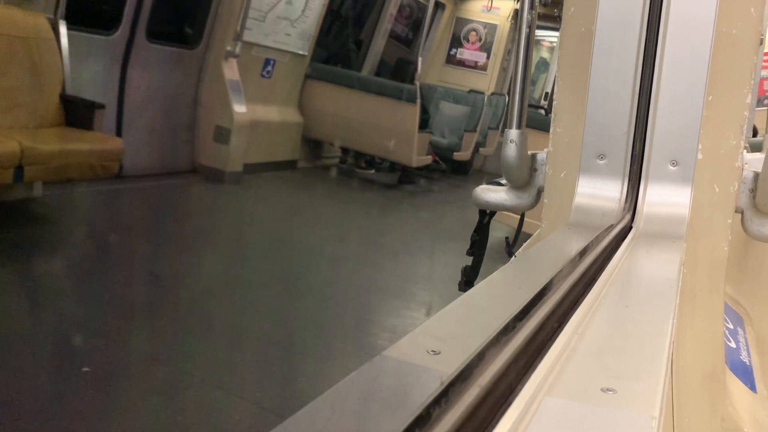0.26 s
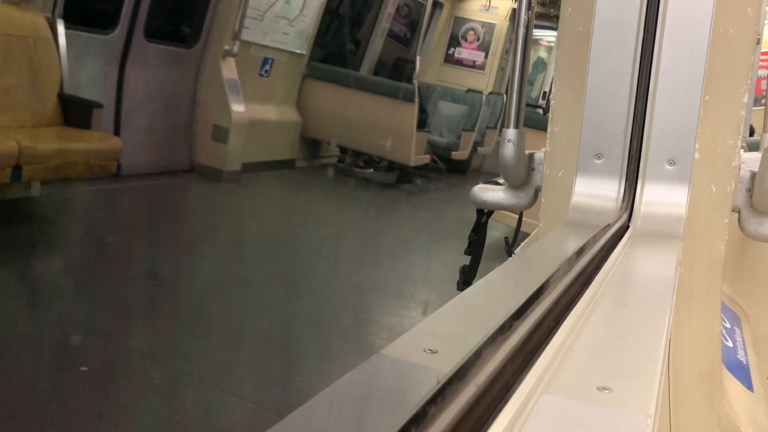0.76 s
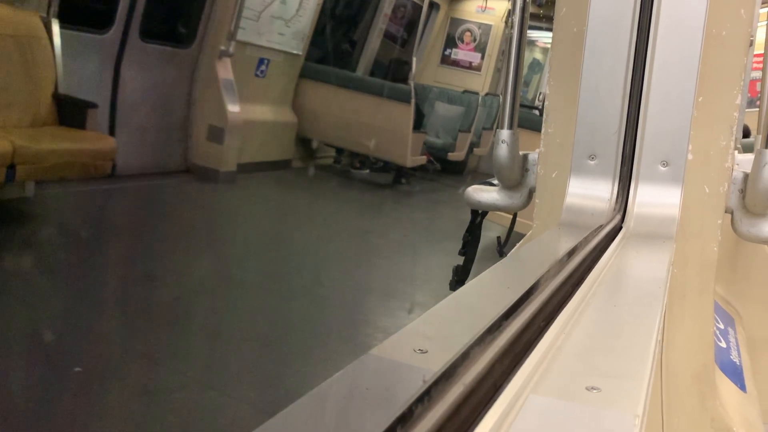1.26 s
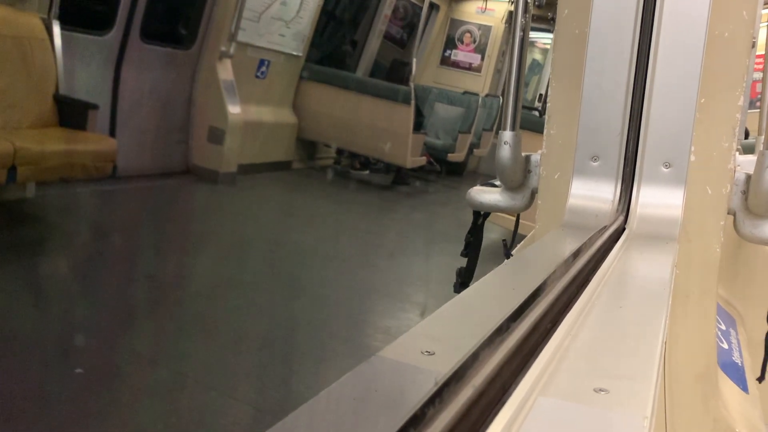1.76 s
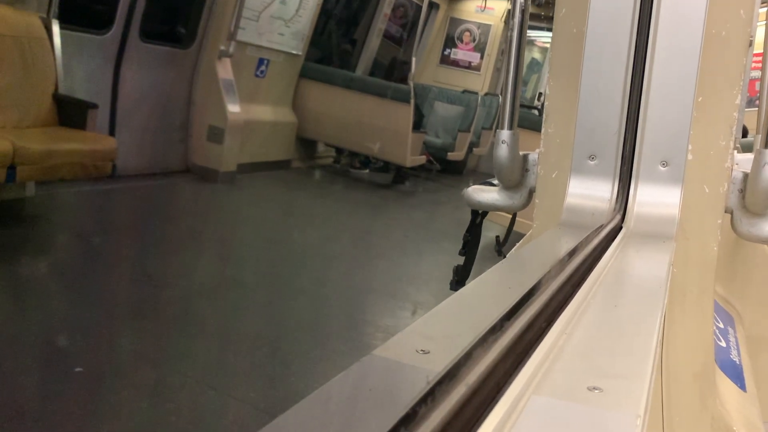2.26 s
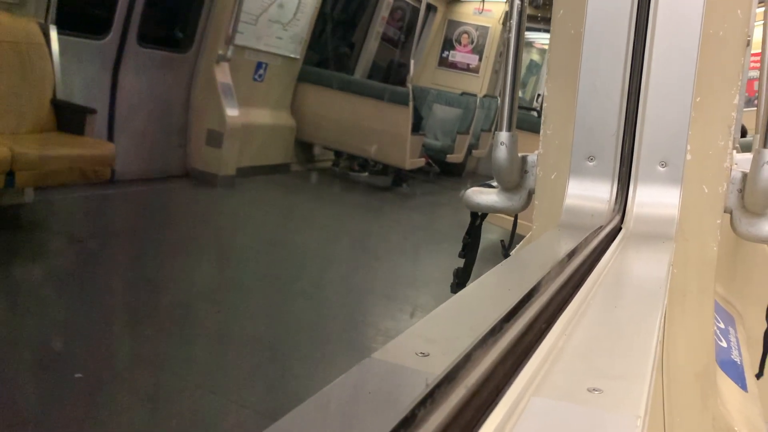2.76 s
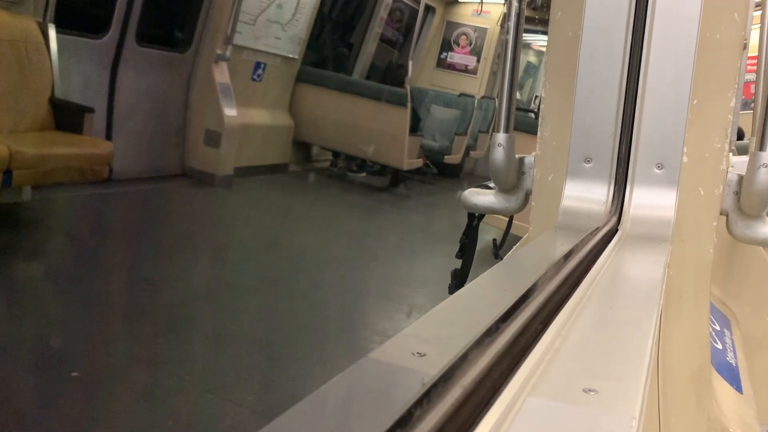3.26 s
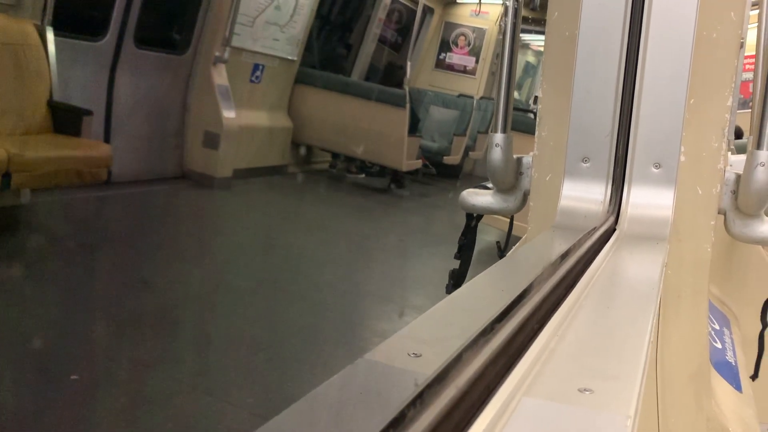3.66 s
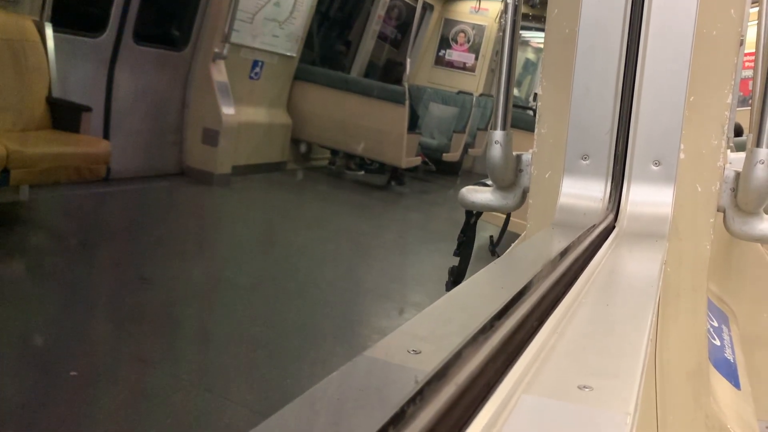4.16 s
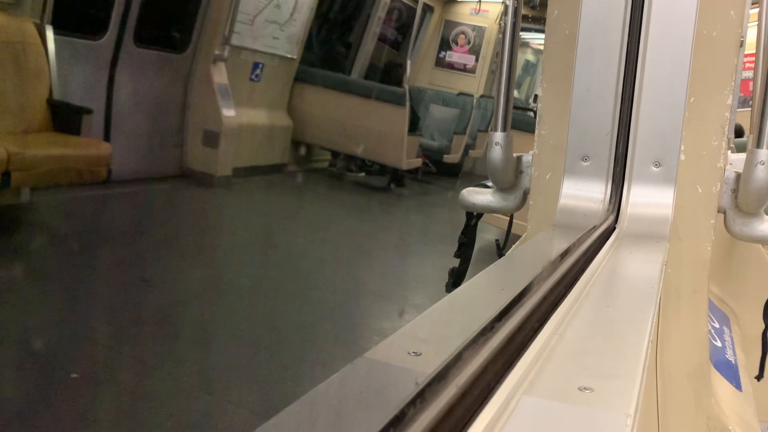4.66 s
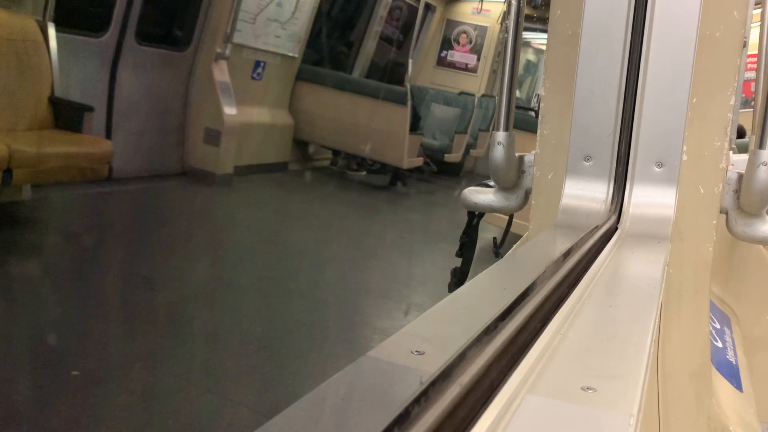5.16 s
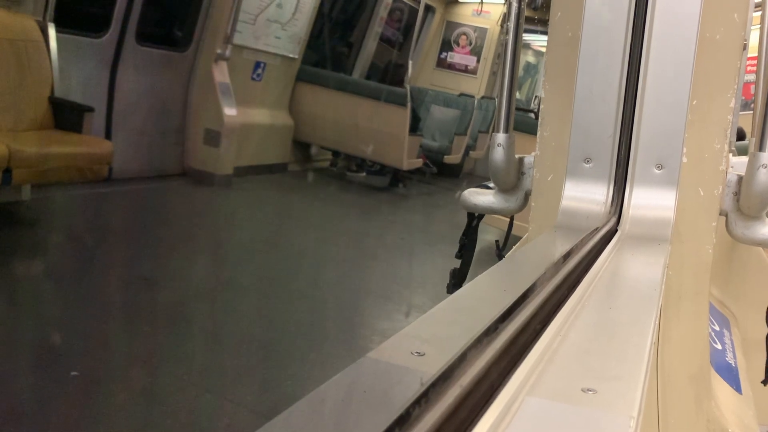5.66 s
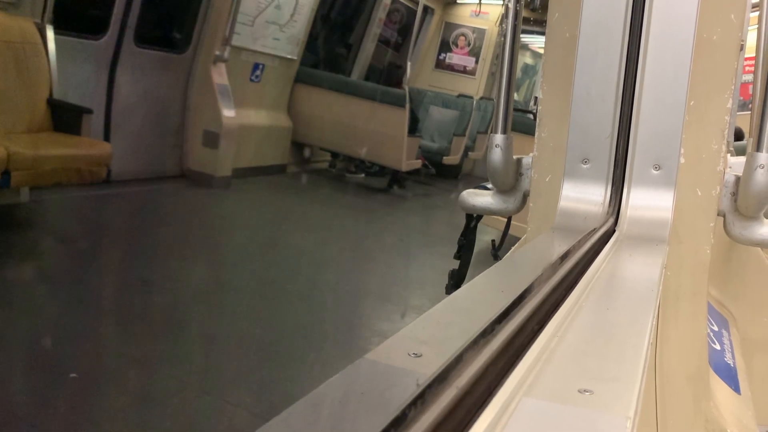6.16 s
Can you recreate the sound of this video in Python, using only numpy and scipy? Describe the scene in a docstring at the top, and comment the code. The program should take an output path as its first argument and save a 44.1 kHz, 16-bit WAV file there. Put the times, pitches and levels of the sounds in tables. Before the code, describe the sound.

A metro train runs through a tunnel, heard from inside the carriage near the doors. Rough wheel rumble, growl and howling begin loudly, then thin out to a nervous, pulsing drone with harsh metallic overtones and faint tingling fittings. Two strong rasps come mid-way and later, before the train eases off. Low uneven body thumps, hiss and equipment hum persist in wide stereo.

```python
"""Metro car in a tunnel

The wheels roll over two wavelengths of rail corrugation, made as sines of scattered rate through a dense echo.
Long ripples give a low howl that dies away; short ones a higher drone with brief bursts, and overtones that rasp
in uneven surges. Under them the car body booms and equipment hums. Shaped noise makes the roar, growl, hiss and wash;
resonances make the wheels ring and the fittings tingle. The drone falls in pitch as the train eases off."""
import sys
import numpy as np
from scipy import signal
from scipy.fft import rfft, irfft
from scipy.io import wavfile
from scipy.ndimage import uniform_filter1d

SR = 44100
rng = np.random.default_rng(int(sys.argv[2]) if len(sys.argv) > 2 else 0)


def output_pcm(signal):
    """Save a mono or channel-first signal as 16-bit PCM at the path in sys.argv[1].

    Samples are clipped to [-1, 1] before scaling.
    """
    pcm = np.clip(np.atleast_2d(signal).T, -1, 1) * 32767
    wavfile.write(sys.argv[1], SR, np.round(pcm).astype(np.int16))


N = 282240
TIME = np.arange(N) / SR
BINS = np.maximum(np.fft.rfftfreq(N, 1 / SR), 1)  # Hz
NOISE_LAG_MS = .27  # delay at the left ear
CONTACT_SAG_DB_PER_S = 0.25  # roar, hiss and tingles sink as the train eases off
GRAIN_DB = 1.6  # depth of random patches of pitch and time in the roar and ring
HALF_PAN = np.array([[.5], [-.5]])  # shares a left minus right level between the ears


def from_db(db):
    """Decibels to gain."""
    return 10 ** (np.asarray(db) / 20)


def in_time(rows):
    """A table over seconds, joined by straight lines, at every sample."""
    s, value = np.transpose(rows)
    return np.interp(TIME, s, value)


def at_bins(points):
    """A table over log frequency at every bin."""
    hz, value = np.transpose(points)
    return np.interp(np.log(BINS), np.log(hz), value)


def swells(rows, between_db):
    """Level in dB: each row is a bell-shaped swell, 6 dB down at its ends, added in power to the level between."""
    power = from_db(between_db) ** 2
    for middle_s, length_s, level_db in rows:
        bell = .5 ** ((2 * (TIME - middle_s) / length_s) ** 2)
        power = power + (from_db(level_db) * bell) ** 2
    return 10 * np.log10(power)


def drift(rate_hz, count=1):
    """Rows of slow chance with spread 1: white noise through a two-pole lowpass, drawn at every 40th sample."""
    r = np.exp(-2 * np.pi * rate_hz * 40 / SR)
    white = rng.standard_normal((count, N // 40 + 2002))
    slow = signal.lfilter([1], [1, -2 * r, r * r], white)[:, 2000:]  # drops the start of the filter
    position = np.arange(N) / 40
    return np.array([np.interp(position, np.arange(len(row)), row / row.std()) for row in slow])


def at_ears(pair, likeness, lag_ms, pan_db=0):
    """Two unrelated spectra become left and right: partly alike, the left one delayed; centre rms 1."""
    alike = np.clip(likeness, 0, .999)
    mixed = alike * pair[0] + np.sqrt(1 - alike ** 2) * pair[1]
    left = mixed * np.exp(-2j * np.pi * BINS * lag_ms / 1000)
    x = irfft([left * from_db(pan_db), pair[0]], N)
    return x / x.mean(0).std()


def steadied(x, span_s):
    """Keeps the fast flutter of each channel and evens out its slow swells; rms 1."""
    size = max(int(span_s * SR), 2)
    power = uniform_filter1d(uniform_filter1d(x ** 2, size), size)
    x = x / np.sqrt(power + 1e-12)
    return x / x.std()


def patchy(x, patch_db, size_bands=4, size_frames=11):
    """Small random patches of pitch and time come out louder or softer; centre rms 1."""
    spectra = signal.stft(x, nperseg=512)[2]
    field = rng.standard_normal(spectra.shape[1:])
    for size, axis in [(size_bands, 0), (size_frames, 1)] * 2:
        field = uniform_filter1d(field, size, axis=axis)
    x = signal.istft(spectra * from_db(patch_db * field / field.std()))[1][:, :N]
    return x / x.mean(0).std()


def cabin_noise(spectrum):
    """Random vibration radiated by the panels, dying off past the ends of its spectrum; the left ear is late."""
    # likeness of the sound at the two ears: hz, likeness (0-1)
    likeness = [(30, .95), (100, .99), (240, .92), (330, .85), (420, .6), (600, .25), (1000, .15),
                (1800, .33), (3500, .2), (6500, .35), (10000, .65)]
    # balance of the ears: hz, left_minus_right_db
    balance = [(90, -1.8), (180, -1.4), (350, 2.3), (440, 0), (550, 3.5), (800, 2), (1050, 0), (1400, 1),
               (2200, 0), (4500, -1), (6000, -3), (8000, 0)]
    inside = np.clip(BINS, spectrum[0][0], spectrum[-1][0])
    skirts_db = -30 * abs(np.log2(BINS / inside))  # 30 dB per octave
    pair = rfft(rng.standard_normal((2, N))) * from_db(at_bins(spectrum) + skirts_db)
    return at_ears(pair, at_bins(likeness), NOISE_LAG_MS, at_bins(balance))


def tunnel_echo(x, t60):
    """Spectra of two signals after dense reflections between tunnel wall and car; t60 in seconds."""
    tails = rng.standard_normal((2, N)) * from_db(-60 * TIME / t60)
    response = rfft(tails)
    response /= np.sqrt(uniform_filter1d(abs(response) ** 2, size=100))  # evens out the tone colour
    soft_ends = signal.windows.tukey(N, .004)
    return rfft(x * soft_ends) * response


def wheel_phases(rate_hz, unevenness, change_hz, lock):
    """Four wheels a side ride unevenly spaced ripples; the first locks to them best, the last wanders most."""
    wander = unevenness * np.tile(np.linspace(lock, 1, 4), 2)[:, None]
    hz = rate_hz * (1 + wander * drift(change_hz, count=8))
    turns = np.cumsum(hz, axis=1) / SR + rng.random((len(hz), 1))
    return (2 * np.pi * (turns % 1)).astype(np.float32).reshape(2, -1, N)


def standing_out(level_db, roughness_db):
    """Gain of a rail pattern: when shallow it is lost in the general roughness."""
    level = from_db(level_db)
    return level ** 2 / np.hypot(level, from_db(roughness_db))


def low_howl(rate_hz):
    """Long, smooth ripples shake the wheels as a wavering sine; on the deepest ones the wheels fall into step."""
    # patches of long ripples: middle_s, length_s, level_db (before masking by roughness and trim)
    patches = [(0.11, 0.14, -17.5), (0.31, 0.17, -22), (0.62, 0.29, -23), (1.07, 0.2458, -14),
               (1.38, 0.15, -25), (1.6, 0.075, -21.5), (1.81, 0.3, -22.5), (2.15, 0.14, -22.5),
               (2.77, 0.25, -25.5), (3.08, 0.16, -31), (4.2, 0.54, -31.5)]
    long_ratio = .706  # rate of the long ripples against the short ones
    in_step_db = -16  # howl level that halves the scatter of the wheels' rates
    level_db = swells(patches, -26.5 - 2.08 * TIME)  # between the patches it sinks in dB per s
    unevenness = .079 / (1 + from_db(level_db - in_step_db) ** 4)  # share of the rate
    waver = 1 + 0.1212 * unevenness * drift(9)[0]  # common to all wheels
    phase = wheel_phases(rate_hz * long_ratio * waver, unevenness, change_hz=35.53, lock=0.4387)
    howl = at_ears(tunnel_echo(np.sin(phase).sum(1), t60=0.13), likeness=0.73, lag_ms=0.34)
    flutter = from_db(-0.63 + 1.8 * drift(17))
    return flutter * standing_out(level_db, roughness_db=-34.5) * steadied(howl, span_s=0.032)


def high_drone(rate_hz, bite_db):
    """Short ripples sing higher, more in step where they bite; standing waves in the car flutter at each ear."""
    # the drone throughout: time_s, level_db (before trim and flutter)
    drone_levels = [(0.0, -16), (0.25, -25), (0.55, -20), (1.0, -18), (1.3, -22), (1.75, -16.5), (2.1, -22),
                    (2.55, -20), (2.8, -23), (3.45, -16), (3.7, -18), (4.2, -15.5), (4.7, -19.5),
                    (4.95, -20.5), (5.2, -22), (5.8, -30), (6.4, -24.5)]
    trim_db, pan_db, flutter_db = -3, 3, 1.62
    settle_s = 16  # time constant in which the wheels' scatter narrows
    lock_per_db = 0.108  # dB by which the scatter shrinks for each dB of bite
    ears_db = pan_db * HALF_PAN + flutter_db * drift(27, count=2)
    unevenness = .078 * np.exp(-TIME / settle_s) * from_db(-lock_per_db * bite_db)
    phase = wheel_phases(rate_hz, unevenness, change_hz=44.32, lock=0.4483)
    drone = at_ears(tunnel_echo(np.sin(phase).sum(1), t60=0.29), likeness=0.33, lag_ms=0.56)
    return from_db(trim_db + in_time(drone_levels) + ears_db) * steadied(drone, span_s=0.037)


def hammering(rate_hz, bite_db):
    """Wheels strike the crests of deep short ripples: the harder, the richer the overtones, each flaring alone."""
    # overtones of the drone's rate at full bite, against each other: multiple, level_db
    overtones = [(2, 5), (3, -5), (4, -9.5), (5, -14.5), (6, -26.5)]
    full_bite_db = 13.5
    tilt_db = 0.044 * (bite_db - full_bite_db)  # per step up the overtones
    phase = wheel_phases(rate_hz, unevenness=.052, change_hz=38.06, lock=.55)
    strikes = 0
    for multiple, level_db in overtones:
        flare_db = 1.6 * drift(16)
        gain = from_db(level_db + (multiple - 2) * tilt_db + flare_db)
        strikes = strikes + gain * np.sin(multiple * phase).sum(1)
    rasp = at_ears(tunnel_echo(strikes, t60=0.07), likeness=0.24, lag_ms=0.15)
    depth = standing_out(-47 + bite_db, roughness_db=-47.5)
    return from_db(2.0) * depth * steadied(rasp, span_s=0.18)


def drone_bursts():
    """Short bursts of the drone swell and fade, each at its own pitch and side; also gives the drone left under them."""
    # bursts: start_s, level_db (before trim), pitch_hz, left_minus_right_db, rise_s, left_delay_ms
    bursts = [(0.002, -14.5, 629, 10, 0.0064, 0.3), (0.043, -17, 630, 1, 0.0076, 0.58),
              (0.189, -14.5, 667, -3.5, 0.015, 0.35), (0.45, -16, 614, 13, 0.016, 0.49),
              (0.561, -14, 612, 11, 0.011, 0.29), (0.608, -13.5, 640, 6, 0.01, 0.33),
              (0.663, -11.5, 642, 3, 0.01, 0.28), (0.722, -14, 655, 8, 0.0056, 0.22),
              (0.838, -8.5, 624, 1, 0.0076, 0.44), (0.94, -11, 628, 4, 0.011, 0.34),
              (0.963, -12, 647, 7, 0.018, -0.27), (1.047, -12.5, 634, -1, 0.012, 0.78),
              (1.114, -11.5, 619, 5, 0.015, 0.76), (1.425, -11, 625, 4, 0.0093, 0.62),
              (1.477, -11.5, 635, -2.5, 0.015, 0.68), (1.725, -8.5, 620, 7, 0.0067, 0.32),
              (1.764, -8.5, 615, 6, 0.013, 1), (2.066, -10, 446, 2, 0.0097, 0.32),
              (2.469, -16, 609, -7, 0.0089, 0.67), (2.514, -12.5, 624, 5.5, 0.012, 0.54),
              (2.598, -14, 622, 7, 0.008, 0.3), (3.088, -16.5, 627, 14, 0.0099, 0.71),
              (3.159, -17.5, 640, -2, 0.017, 0.09), (3.275, -13.5, 636, 3, 0.012, -0.064),
              (3.317, -11.0, 601, 4, 0.014, -0.17), (3.345, -12.0, 630, -7, 0.012, 0.48),
              (3.404, -13, 601.4, -5.5, 0.025, 0.32), (3.434, -9, 648, -4.5, 0.019, 0.44),
              (3.525, -10, 630, 5, 0.014, 0.33), (3.609, -14.5, 640, 0, 0.0032, 0.42),
              (3.805, -10.5, 600, 5, 0.0088, 0.6), (3.928, -13, 602, -3, 0.017, 0.67),
              (3.982, -14, 597, 8.5, 0.014, 0.49), (4.112, -12, 606, 7, 0.008, 0.29),
              (4.149, -8.5, 600, 3.5, 0.015, 0.88), (4.202, -13, 590, 1, 0.01, 0.81),
              (4.269, -13, 605, 11, 0.017, -0.49), (4.307, -8.5, 618, 0, 0.0095, 0.55),
              (4.342, -10, 609, 2, 0.004, 0.61), (4.432, -10.5, 620, -2, 0.014, -0.4),
              (4.472, -14.5, 602, 9, 0.0048, -0.1), (4.671, -18.0, 613, 11, 0.007, 0.58),
              (4.811, -13.5, 600, 4, 0.007, 0.6), (4.909, -12, 621, 4.5, 0.011, 0.5),
              (4.964, -12.5, 595, -2, 0.014, 0.56), (5.038, -15.5, 610, 10, 0.015, 0.3),
              (5.353, -18, 619, 9.5, 0.017, 0.98), (5.632, -19, 599, 4, 0.011, 0.6),
              (5.672, -18, 603, 6, 0.011, 0.45)]
    trim_db = -0.7
    duck = 0.55  # share by which the drone ducks under each burst
    out, drone_left = np.zeros((2, N)), np.ones(N)
    for start_s, level_db, pitch_hz, pan_db, rise_s, lag_ms in bursts:
        near = slice(max(int(start_s * SR), 0), int((start_s + 10 * rise_s) * SR))
        age = TIME[near] - start_s
        swell = (age / rise_s) ** 2 * np.exp(2 - 2 * age / rise_s)  # peaks at 1 after rise_s
        tone = np.sin(2 * np.pi * pitch_hz * (age - np.array([[lag_ms / 1000], [0]])))
        out[:, near] += from_db(trim_db + level_db + pan_db * HALF_PAN) * swell * tone
        drone_left[near] *= 1 - duck * swell
    return out, drone_left


def wheel_ring(bite_db):
    """Rolling keeps the wheel discs ringing in a few broad modes; the ring follows the bite, else nearly level."""
    # modes of the discs, against each other: pitch_hz, width_hz, level_db
    disc_modes = [(1820, 140, 4), (2450, 220, 4), (3040, 310, -2.5), (3950, 1100, -9.5)]
    # the discs sing out briefly: middle_s, length_s, level_db (against the steady ring, added in power)
    flares = [(1.05, 0.22, -5), (1.55, .14, 1.5), (3.455, .12, 0.5), (4.28, .12, -6)]
    modes = sum(from_db(db) / (1 + (2 * (BINS - hz) / width_hz) ** 2) for hz, width_hz, db in disc_modes)
    ring = at_ears(rfft(rng.standard_normal((2, N))) * modes, likeness=0.26, lag_ms=NOISE_LAG_MS)
    level_db = -57.5 + 0.92 * bite_db + swells(flares, 0) - 0.04 * TIME
    return from_db(level_db) * patchy(ring, GRAIN_DB)


def tingles(bite_db, low_hz, high_hz, tilt_db_per_octave, count=72):
    """Many small metal fittings are jolted at random; each rings briefly at its own pitch and place."""
    jolts_per_s, t60_s = 260, 0.12  # jolts of all fittings together
    out = np.zeros((2, N))
    r = from_db(-60 / (t60_s * SR))  # decay per sample
    sides = rng.uniform(-.25, .75, count) * np.pi
    for hz, side in zip(np.linspace(low_hz, high_hz, count), sides):
        chance = rng.random(N, dtype=np.float32)
        jolts = (chance < jolts_per_s / count / SR) + 1e-18  # the tiny offset keeps the filter fast
        w = 2 * np.pi * hz * rng.uniform(.99, 1.01) / SR
        ring = signal.lfilter([1, 0, -1], [1, -2 * r * np.cos(w), r * r], jolts)
        gain = from_db(tilt_db_per_octave * np.log2(hz / low_hz))
        out += gain * np.outer([np.cos(side), np.sin(side)], ring)
    band = signal.butter(2, [low_hz, high_hz], "band", fs=SR, output="sos")
    out = signal.sosfilt(band, out)
    level_db = -49.5 + 0.54 * bite_db - CONTACT_SAG_DB_PER_S * TIME
    return from_db(level_db) * out / out.std()


def rolling(bite_db):
    """Fine roughness of steel roars, worn patches growl, the flanges hiss, and the tunnel returns an even wash."""
    # spectra, each levelled as a whole afterwards: pitch_hz, density_db (per Hz)
    roar_spectrum = [(400, -3), (800, 0.5), (1000, -1), (1500, -0.9), (1800, 0.5), (2150, -1), (3000, -3.5),
                     (4000, -7), (4700, -10.5), (5400, -13.5)]
    growl_spectrum = [(560, -17.5), (680, -1.5), (780, -0.5), (880, -2.5), (980, -17), (1100, -11)]
    hiss_spectrum = [(3500, -9.5), (5000, -3.5), (6500, 6.5), (8000, -15.5), (10000, -3.5), (12000, -9),
                     (14000, -15.5)]
    wash_spectrum = [(100, -2.5), (125, -2.5), (170, -2), (250, -2.5), (330, -0.5), (400, -4), (520, 2.67),
                     (720, 1), (850, -11.5), (1000, -11.5), (1600, -20), (4000, -37.5)]
    # worn patches of rail: middle_s, length_s, level_db (before masking by roughness and trim)
    worn_patches = [(0.19, 0.076, -36.5), (0.58, 0.13, -35), (1.09, 0.19, -34), (1.33, 0.18, -40),
                    (2.1, 0.23, -37), (1.6, 0.093, -36), (1.82, 0.2, -33), (2.63, 0.13, -36.5),
                    (3.26, 0.065, -42), (3.58, 0.63, -39), (4.48, 0.18, -39.5), (4.95, 0.054, -42),
                    (5.3, .3, -49)]
    # flanges brush the rail and hiss harder: middle_s, length_s, level_db (against steady hiss, added in power)
    brushes = [(1.05, .5, -4.5), (1.8, .3, -5), (2.92, .14, -1.5), (4.25, 0.55, 1), (6.35, 0.22, 2)]
    sag_db = CONTACT_SAG_DB_PER_S * TIME
    fade_db = 2.5 * np.maximum(TIME - 4.06, 0)  # the hiss fades further from 4.06 s on, in dB per s
    roar_db = -49.5 + 0.45 * bite_db - sag_db + .5 * drift(29)
    roar = from_db(roar_db) * patchy(cabin_noise(roar_spectrum), GRAIN_DB)
    wear_db = swells(worn_patches, -36.5 - 4.1 * TIME)
    growl = from_db(7.0) * standing_out(wear_db, roughness_db=-29.5) * cabin_noise(growl_spectrum)
    hiss_db = -66.5 + 0.42 * bite_db + swells(brushes, 0) - sag_db - fade_db + drift(8)
    hiss = from_db(hiss_db) * cabin_noise(hiss_spectrum)
    wash = from_db(-28.5 - 0.24 * TIME) * cabin_noise(wash_spectrum)
    return roar + growl + hiss + wash


def hum(hz, wander_hz):
    """A slightly wavering sine of rms 1."""
    return np.sqrt(2) * np.sin(2 * np.pi * np.cumsum(hz + wander_hz * drift(2.9)) / SR)


def car_body():
    """The floor booms, shaken by a fan, and swells briefly and unevenly; a transformer hums beneath it."""
    # boom spectrum, levelled as a whole afterwards: pitch_hz, density_db (per Hz)
    boom_spectrum = [(28, -27.5), (40, -12.5), (52, -8), (64, 1.5), (84, -1), (100, -8.5), (135, -17)]
    # the boom swells briefly: middle_s, length_s, level_db (added in power to the steady boom)
    boom_swells = [(0.065, 0.08, -32.5), (0.32, 0.054, -34), (0.45, 0.057, -33), (0.86, 0.055, -33),
                   (1.0, 0.056, -31.5), (1.21, .07, -35), (1.4, .05, -30), (1.5, 0.053, -32),
                   (1.65, 0.056, -32), (1.73, 0.046, -28), (2.075, 0.091, -31), (2.42, 0.036, -23.5),
                   (2.5, 0.044, -36), (2.96, .06, -30), (3.06, 0.05, -29.5), (3.29, 0.18, -31.5),
                   (3.71, 0.044, -32.5), (3.8, 0.049, -31), (3.99, 0.053, -30.5), (4.2, .07, -36),
                   (4.715, 0.047, -25), (4.95, 0.054, -27), (5.165, .05, -27), (5.245, 0.044, -30),
                   (5.39, 0.064, -30), (5.83, 0.1, -30), (5.945, 0.089, -27), (6.075, 0.082, -36),
                   (6.28, 0.041, -27)]
    fan = from_db(-4.5) * hum(74.6, wander_hz=0.71)  # level against the boom noise
    shaking = cabin_noise(boom_spectrum) + fan
    boom = from_db(swells(boom_swells, -34.5)) * steadied(shaking, span_s=0.12)
    mains = from_db(-48) * hum(118.1, wander_hz=.5)
    return (boom + mains) * from_db([[-1.2], [.6]])  # left, right


def scene():
    """Everything heard inside the car."""
    # short ripples passed per second, which follows the speed: time_s, rate_hz
    ripple_rate = [(0, 634), (1.0, 634), (3.5, 623), (4.3, 614), (5.0, 606), (6.4, 604)]
    # wheels bite into deep short ripples: middle_s, length_s, bite_db (against smooth rail, added in power)
    surges = [(0.05, 0.7, 3.5), (0.65, 0.28, 3.5), (1.08, 0.59, 3.5), (1.56, 0.28, 4.5), (1.83, 0.28, 6.5),
              (2.6, 0.29, 7), (2.93, 0.15, -1.5), (3.195, 0.092, 8.5), (3.28, 0.097, 10), (3.365, 0.08, 12),
              (3.47, 0.22, 11.5), (3.61, 0.2, 3), (3.97, 0.31, 5), (4.09, 0.086, 8), (4.23, .18, 14),
              (4.39, 0.23, 12), (4.57, 0.28, 6.5), (4.93, 0.14, 4), (5.2, 0.12, 4.5), (5.34, 0.22, 8.5),
              (6.35, 0.16, -3.5)]
    rate_hz = in_time(ripple_rate)
    bite_db = swells(surges, 0)
    bursts, drone_left = drone_bursts()
    howl = low_howl(rate_hz)
    drone = drone_left * high_drone(rate_hz, bite_db)
    wheels = howl + drone + hammering(rate_hz, bite_db) + bursts
    metal = wheel_ring(bite_db) + tingles(bite_db, low_hz=1292, high_hz=4776, tilt_db_per_octave=-7.0)
    return wheels + metal + rolling(bite_db) + car_body()


def record(dry):
    """The ends are eased over a few milliseconds and the top is cut steeply."""
    eased = dry * signal.windows.tukey(N, .001)
    top_cut = signal.ellip(10, .2, 80, 12400, fs=SR, output="sos")  # ripple dB, stop dB, cutoff Hz
    return signal.sosfilt(top_cut, eased)


dry = scene()
out = record(dry)
output_pcm(out)
```